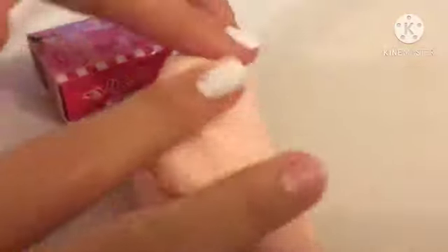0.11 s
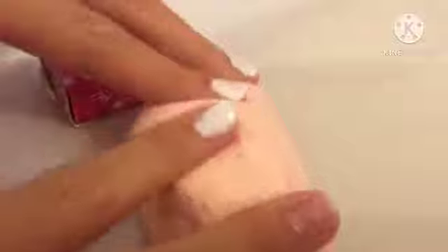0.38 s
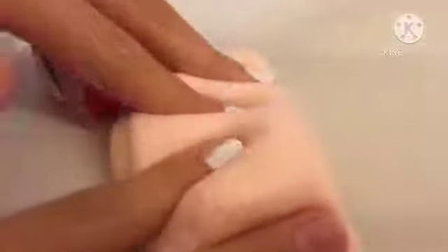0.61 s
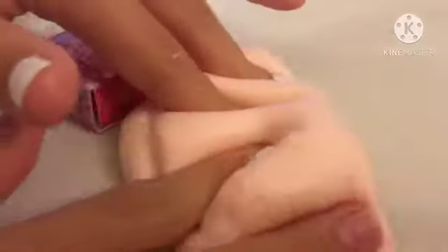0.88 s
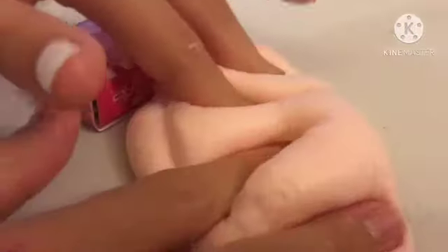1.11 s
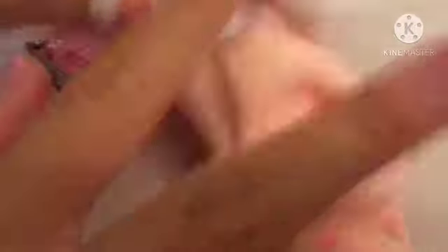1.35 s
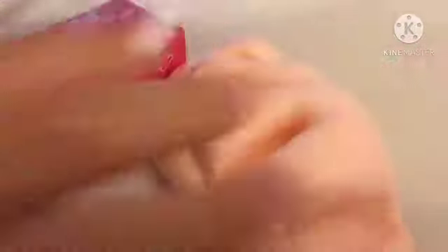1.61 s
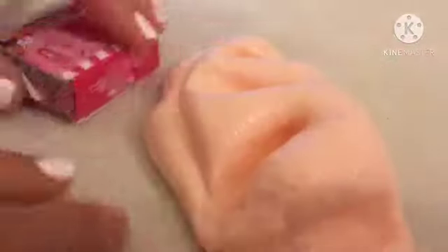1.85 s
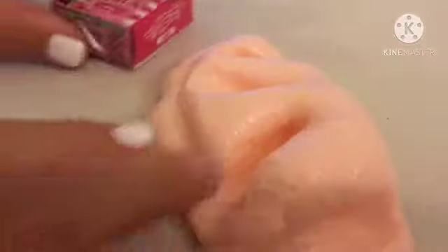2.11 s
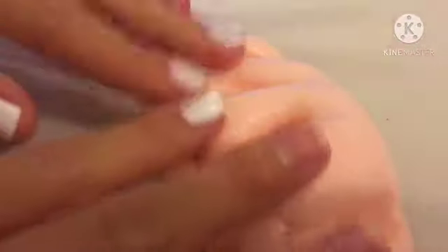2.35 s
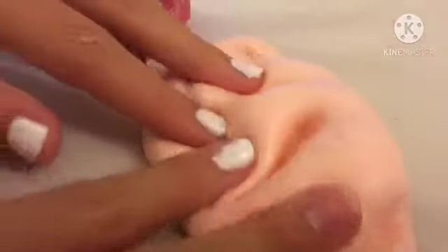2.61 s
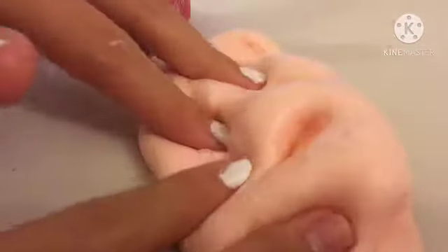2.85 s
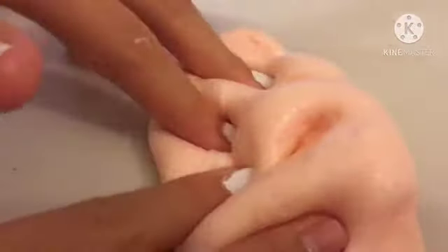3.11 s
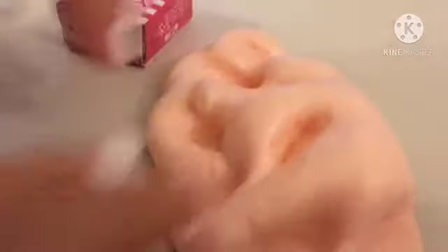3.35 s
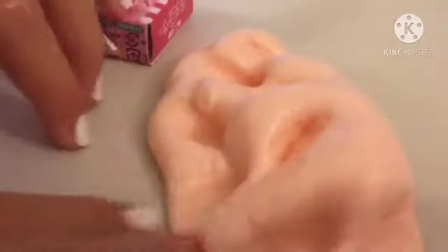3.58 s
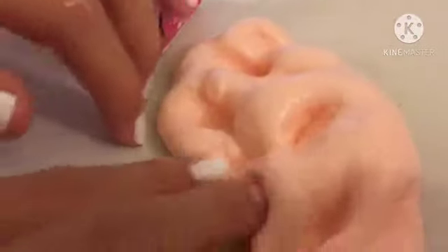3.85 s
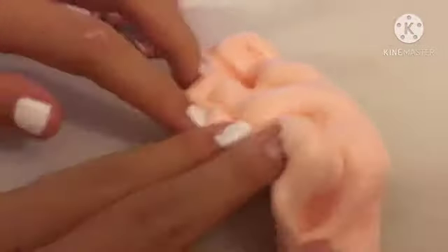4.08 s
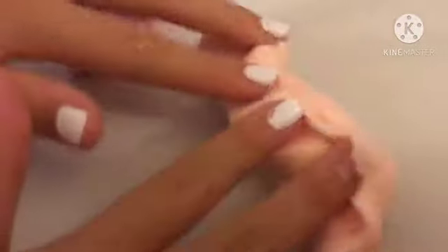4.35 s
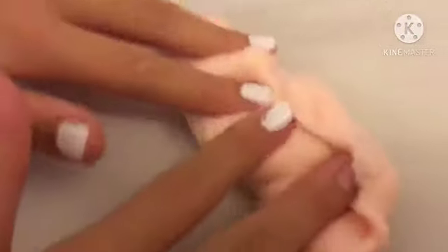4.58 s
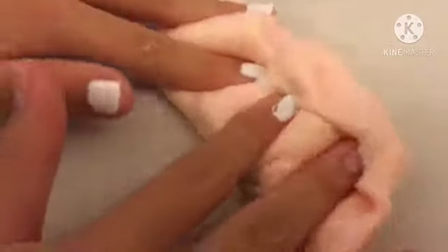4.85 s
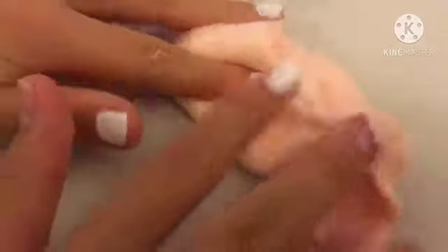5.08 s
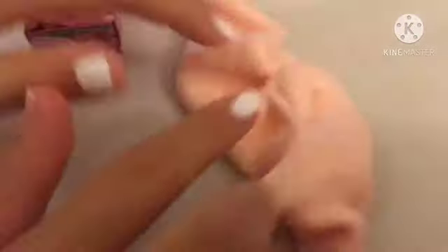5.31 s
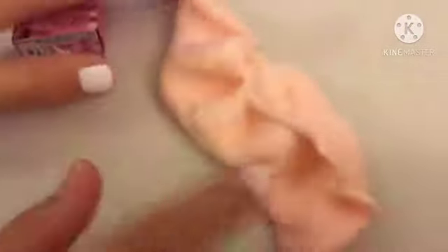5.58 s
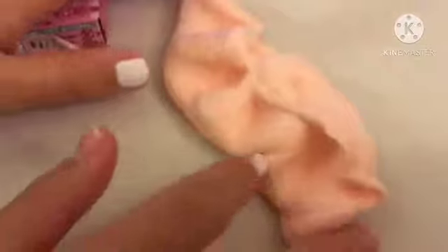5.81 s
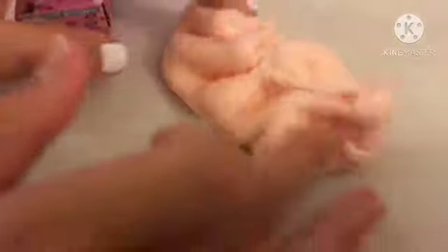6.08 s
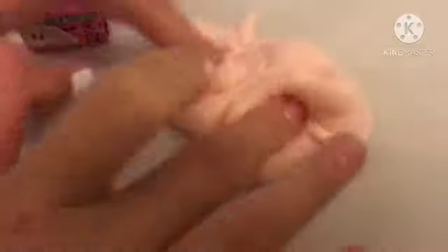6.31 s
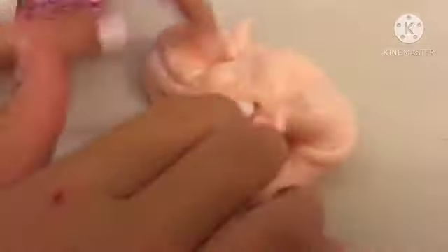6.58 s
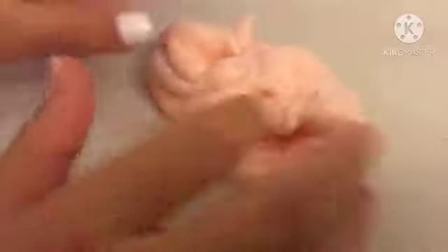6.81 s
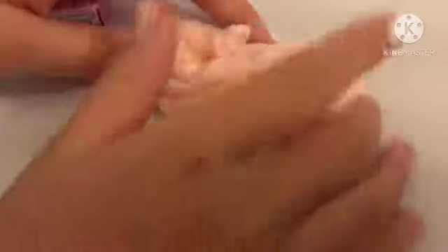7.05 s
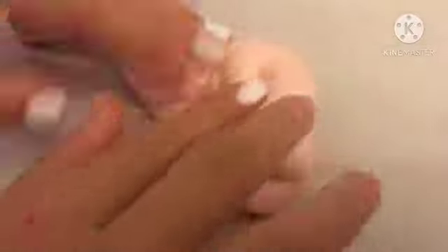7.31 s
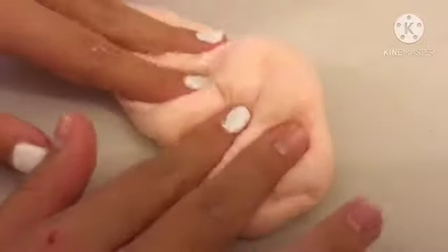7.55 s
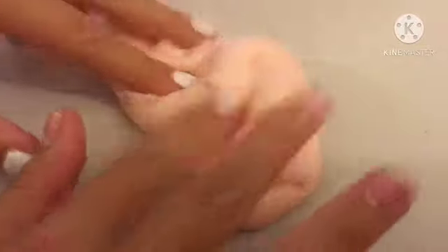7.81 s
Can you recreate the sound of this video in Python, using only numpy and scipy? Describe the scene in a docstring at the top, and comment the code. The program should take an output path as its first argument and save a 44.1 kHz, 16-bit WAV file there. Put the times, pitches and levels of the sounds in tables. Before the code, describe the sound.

A quiet indoor room with soft low noise and a faint hum. Slime is kneaded on a table right beside a small microphone. Mostly tiny ticks and airy foam rustle for three seconds, then a bright pop and a crowded run of boomy table thumps, ragged sticky snaps and dense crackle. Afterward come isolated thumps, a wet squelchy push, and faint rubs with a few light clicks.

```python
"""Kneading foamy slime on a table

Hands knead soft foamy slime on a table, close to a phone microphone that feels the table top shake.
Presses send thuds through the board, treble first; sticky slime snaps off it and off the fingers
as a crack, a ragged tear and a ring of the table. Grains of noise make the pushes and wet squelches;
hiss and crackle swell in rubbing strokes and a few short dense tears, over room noise and a faint hum."""
import sys
import numpy as np
from scipy import signal
from scipy.fft import rfft, irfft, next_fast_len
from scipy.io import wavfile
from scipy.ndimage import uniform_filter1d

SR = 44100
rng = np.random.default_rng(int(sys.argv[2]) if len(sys.argv) > 2 else 0)


def output_pcm(signal):
    """Save a mono or channel-first signal as 16-bit PCM at the path in sys.argv[1].

    Samples are clipped to [-1, 1] before scaling.
    """
    pcm = np.clip(np.atleast_2d(signal).T, -1, 1) * 32767
    wavfile.write(sys.argv[1], SR, np.round(pcm).astype(np.int16))


def level_to_linear(level):
    """Convert decibel levels to linear amplitude factors, elementwise."""
    exponent = np.asarray(level, float) / 20
    return 10 ** exponent


N = 349713  # length [samples]

# presses felt through the table top:
# (time [s], peak level [dB], centre [Hz], width [natural log of frequency])
THUDS = [(0.177, -39.5, 170, 0.39), (0.7764, -43, 96, 0.14), (0.798, -45.5, 93, 0.11),
         (1.3318, -31, 116, 0.56), (1.3609, -26, 154, 0.16), (1.865, -45.5, 96, 0.062),
         (3.281, -30, 164, 0.2), (3.3217, -20.5, 420, 0.28), (3.47, -32, 137, 0.2), (3.5618, -30.5, 166, 1),
         (3.5862, -25.5, 117, 0.49), (3.902, -13, 221, 0.37), (3.95, -13.5, 105, 0.56),
         (3.9962, -14.5, 123, 0.41), (4.0343, -21, 88, 0.36), (4.0638, -20.3, 72.6, 0.71),
         (4.082, -33, 60.0, 0.51), (4.1654, -19, 164, 0.5), (4.189, -10, 82, 0.51),
         (4.2096, -19.5, 112, 0.65), (4.2687, -22.5, 91, 0.7), (4.3234, -10, 113, 0.43),
         (4.3853, -24.5, 85.6, 0.54), (4.422, -16.5, 116, 0.37), (4.4915, -26, 60.0, 1),
         (4.5803, -25, 136, 0.37), (4.63, -21, 137, 0.32), (4.7289, -14.5, 120, 0.39),
         (4.7635, -19.5, 128, 0.56), (4.8142, -10.5, 116, 0.55), (4.881, -23, 91.6, 0.23),
         (5.1658, -21, 98, 0.4), (5.19, -26, 135.0, 0.57), (5.293, -17.5, 132, 0.41),
         (5.5046, -32, 109, 0.36), (5.6478, -30.6, 141, 0.57), (5.7318, -31.5, 133, 0.51),
         (5.897, -29.5, 137, 0.6), (6.007, -28.5, 168, 0.42), (6.0353, -34, 90.0, 0.97),
         (6.0627, -27.5, 114, 0.42), (7.899, -54, 110.0, 0.26)]
# bending-wave delay at 100 Hz [s], power of its growth towards the bass, phase of the push [rad]
SPREAD_S, SPREAD_POWER, THUD_TURN_RAD = 0.01207, 1.758, 2.7

# sticky snaps: (time [s], level [dB], pop [Hz], table ring relative to the snap [dB], pop share [0-1])
SNAPS = [(0.4938, -51, 1260, 0, 0.2), (1.328, -41, 1590, 2.5, 0.16), (1.3515, -32, 2010, 2.5, 0),
         (1.4851, -48, 1280, -6, 0.05), (1.495, -44, 1190, 8.5, 0.6), (1.9085, -43, 1930, -16, 0.8),
         (1.951, -50, 1420, -16, 1), (1.9895, -51, 1340, -17, 0.7), (2.0869, -47.5, 1240, -14, 0.2),
         (2.1313, -48, 1880, -5.5, 0.37), (2.7384, -46.5, 1160, -4, 0.1), (3.27, -20.5, 2000, -5, 0.49),
         (3.3102, -38.5, 2350, 10, 0.4), (3.4693, -48.5, 1150, 15.5, 0.17), (3.5478, -41.5, 1210, 5, 1),
         (3.5572, -33, 1510, 10.5, 0.42), (3.8447, -38.5, 960, 5, 0.33), (3.9024, -44, 1320, 19.5, 0.9),
         (3.932, -39, 1380, -2, 1), (3.947, -21, 1140, -4.5, 0.61), (3.9572, -39.5, 1370, 6, 1),
         (3.9733, -40, 1330, 9, 0.6), (4.065, -32.5, 930, -2.5, 0.99), (4.0927, -39.5, 1780, -15, 0.5),
         (4.16, -41.5, 2060, 3.5, 1), (4.1802, -35.5, 1040, 11.5, 0.6), (4.1938, -31.5, 1220, 5.5, 1),
         (4.2615, -37.5, 1090, 6.5, 1), (4.3109, -36.5, 1130, 1, 1), (4.324, -41, 1010, -1, 0),
         (4.3944, -46, 1020, 9, 0.5), (4.397, -47.5, 7000, -13, 1), (4.4027, -32.5, 1110, -2, 1),
         (4.4215, -36, 1010, 7, 0.54), (4.446, -39, 7100, -5, 0.9), (4.469, -29, 1240, 4, 0.4),
         (4.4798, -24.5, 1030, -9, 0.6), (4.525, -39, 1040, -28, 0.6), (4.5327, -33, 1100, 0.5, 0.58),
         (4.58, -43.5, 1550, 13, 0.3), (4.626, -32, 1220, 0.5, 0.45), (4.637, -36, 2350, -4, 0),
         (4.7059, -34, 2210, -17, 0.8), (4.7185, -22, 960, -2, 0.3), (4.7273, -26.5, 2140, -4, 0.32),
         (4.7572, -26, 2450, -8, 0.3), (4.8038, -28.5, 1360, -3.5, 0.3), (4.8158, -26, 930, -9.5, 0.33),
         (4.8753, -45.5, 1000, 10, 0.2), (4.9217, -46, 1030, -3, 0.24), (5.1664, -36, 1540, 6.5, 0.3),
         (5.2885, -32.5, 1460, -1.5, 0.34), (6.6582, -43, 3030, -8, 0.3), (7.2321, -52.5, 1610, -6, 0.1),
         (7.3002, -52, 3460, -19, 0.8), (7.3283, -40, 1600, -30, 1), (7.449, -34.5, 3150, -13, 0.33),
         (7.504, -61, 1110, -14, 0.1), (7.8785, -43.5, 1560, -7.5, 0)]
# spectrum of a bright snap: (frequency [Hz], relative level [dB per Hz])
SNAP_COLOUR = [(410, -58), (700, 3), (1810, -7.5), (2150, 0.5), (2860, -6.5), (4830, -6), (7240, -19),
               (8920, -14.5), (12000, -35), (15800, -32)]
# ringing modes of the table: (nominal frequency [Hz], lowest level [dB], 60 dB decay time [s])
TABLE_MODES = [(93.7, -3.5, 0.21), (149.4, -0.5, 0.082), (221.6, -4, .17), (274.2, -8.5, 0.26),
               (361.2, -3.5, 0.075), (467, -7, 0.076), (551, -7, 0.066), (626.6, -12.5, 0.1),
               (747, -19, 0.11), (887, -16.5, 0.021), (1152, -20.5, 0.024)]
# the wet tear lasts longer where the slime grips the board harder
TEAR_S, TEAR_DB_PER_RING_DB = 0.074, 0.49  # 60 dB fall at 0 dB ring [s], its growth with the ring

# kneading over time: (time [s], shaking of the board [dB], wet squelch [dB])
KNEAD = [(0, -56.5, -68.5), (1.27, -59.5, -66), (1.38, -50, -51.5), (1.6, -66, -67), (2, -57.5, -67.5),
         (3.2, -62, -68.5), (3.342, -61, -40.5), (3.456, -57, -70), (3.64, -49.5, -68), (3.87, -43, -47.5),
         (4.048, -28, -42.5), (4.12, -57, -51), (4.21, -26, -55), (4.262, -24.5, -65), (4.396, -57, -49),
         (4.534, -36, -52), (4.65, -61, -42), (4.718, -26.5, -51.5), (4.83, -29, -44), (4.894, -45.5, -57),
         (5.192, -38.5, -43.5), (5.316, -39, -58), (5.42, -59, -63), (5.94, -50.5, -66.5),
         (6.054, -33.5, -40), (6.2, -65.5, -68), (6.58, -65, -63.5), (6.67, -53, -51), (6.78, -61.5, -65),
         (7.73, -62, -66.5), (7.93, -53.5, -80)]
# spectrum of the shaking: (frequency [Hz], relative level [dB per Hz])
SHAKE_COLOUR = [(15, -38), (25, -34), (52, -4.5), (92, 2), (143, 0), (271, -15.5), (389, -17.5), (500, -26),
                (650, -29), (1100, -120)]
# spectrum of the squelch: (frequency [Hz], relative level [dB per Hz])
SQUELCH_COLOUR = [(120, -54), (200, -3.5), (273, 1), (386, -5.5), (635, -11), (897, -22.5), (1500, -25),
                  (1950, -84), (3300, -120)]

# rubbing strokes of skin on foam, and a few short bursts of dense tearing:
# (start [s], length [s], level [dB], hollow resonance [Hz], brightness [dB], air [dB])
STROKES = [(0, .07, -83, 2400, 13, -3), (.11, 0.14, -81, 1800, 5, 9), (0.651, 0.2, -74.5, 1760, 2, 1),
           (0.896, 0.26, -73, 1960, 7, -3), (1.304, 0.15, -62, 2400, -1, 4), (1.564, 0.38, -74, 2450, 9, 8),
           (1.82, 0.5, -68, 1320, 0, -9), (3.247, 0.11, -62.5, 1390, 4, 4),
           (3.815, 0.21, -58, 1290, -29, 6.5), (3.984, .06, -72, 1210, -10, 8),
           (4.018, 0.044, -62, 1220, -7, 5), (4.048, 0.055, -56, 1220, -4, 6),
           (4.169, .045, -52, 1240, -10, 3.5), (4.213, 0.2, -86, 1200, -18, 1),
           (4.36, 0.17, -64.5, 1200, -8, 3), (4.462, 0.052, -55.5, 1200, -14, 13.5),
           (4.515, 0.057, -56.5, 1200, -10, 12), (4.563, 0.093, -57, 1220, 3, 8),
           (4.617, 0.07, -51.5, 2200, 3, 3), (4.679, 0.078, -56.5, 2200, -4, 0),
           (4.717, 0.021, -40.5, 2150, 4, -1), (4.746, 0.028, -46, 2390, -3, -3),
           (4.8, .02, -43, 2200, 1.5, -9), (4.823, .1, -68, 1900, -1, 3), (4.924, 0.14, -71, 1700, 5, 3),
           (5.019, .2, -60.5, 1700, 4.5, 2), (5.156, 0.18, -59.5, 2200, 10.5, -1),
           (5.3, 0.42, -74, 1650, 5, -9), (5.87, 0.19, -74, 2310, 9, -8), (5.978, 0.15, -59.5, 2700, 2, -2),
           (6.614, 0.09, -64.5, 1500, -2, -2), (6.94, 0.19, -69, 2900, 2.5, 1),
           (7.225, 0.04, -73, 3800, 6, 8), (7.318, 0.1, -74, 1400, -24, -12),
           (7.438, 0.097, -65.5, 2490, -5, -16), (7.861, 0.089, -63.5, 1510, 7.5, 0)]
# faint rustle under and between the strokes: (time [s], level [dB], air [dB])
RESTING = [(0, -75, 3.5), (3.2, -76.5, 3.5), (3.4, -69, 2), (3.8, -72, 1), (4.3, -67.5, 5),
           (5.7, -68.5, -0.5), (6.5, -71, -4), (7.93, -71.5, -1.5)]
# spectrum of the rustle: (frequency [Hz], relative level [dB per Hz])
RUSTLE_COLOUR = [(470, -48), (800, 1), (918, -7.5), (977, -4), (1110, -4.5), (1590, -6.5), (1820, -7.5),
                 (2200, -7), (3040, -9), (6360, -16.5), (7390, -20.5), (8270, -20.5), (15800, -31.5)]
STROKE_POWER, STROKE_SKEW = 1.43, 0.76  # roundness of a stroke's swell; below 1 it peaks early

# phone shell and table bounce: (centre [Hz], width [Hz], level of the added band [dB])
BODY = [(1550, 36, -1), (2244, 15, -6), (3460, 23, -8.5), (4700, 27, -3), (5450, 34, 1.5), (8430, 61, -8),
        (9000, 840, -7)]

# spectrum of the room noise: (frequency [Hz], relative level [dB per Hz])
ROOM_COLOUR = [(15, -50), (25, -15.5), (89, 0.5), (133, 0), (352, -10.5), (437, -18), (710, -13),
               (956, -36.5), (3590, -36.5), (7640, -38), (8510, -40.5), (14600, -44.5), (15800, -51)]
ROOM_DB = -60.5  # rms level [dB]
# faint hum and a fuzzy band of noise above it: (time [s], hum rms [dB], band rms [dB])
DRONE = [(0, -65.5, -100), (3, -68, -114), (5.3, -82, -74), (6.2, -61, -101), (7.93, -59.5, -75.5)]
HUM_HZ, BAND_HZ = 122, 1560


def evened(x):
    """Scales to rms 1."""
    return x / np.sqrt(np.mean(x ** 2) + 1e-20)


def read(points, hz):
    """Reads a spectrum on a log-frequency axis."""
    f, value = np.transpose(points)
    return np.interp(np.log(hz + 1), np.log(f + 1), value)


def add(mix, s, sound):
    """Mixes a sound in at second s."""
    part = mix[round(s * SR):][:len(sound)]
    part += sound[:len(part)]


def gain_curve(points, index):
    """One dB column of a table over time, as a gain for every sample."""
    rows = np.array(points)
    return level_to_linear(np.interp(np.arange(N) / SR, rows[:, 0], rows[:, index]))


def coloured(x, points):
    """Filters by a spectrum and evens the level."""
    size = next_fast_len(len(x))
    gain = level_to_linear(read(points, np.fft.rfftfreq(size, 1 / SR)))
    return evened(irfft(rfft(x, size) * gain, size)[:len(x)])


def resonate(x, hz, width_hz):
    """A resonance that follows the curve hz: shifted down to 0 Hz, smoothed, shifted back."""
    turn = np.exp(2j * np.pi * np.cumsum(hz * np.ones(len(x))) / SR)
    r = np.exp(-np.pi * width_hz / SR)
    return 2 * (turn * signal.lfilter([1 - r], [1, -r], x / turn)).real


def resonate_twice(x, hz, width_hz, second_width_hz):
    """Two resonances in a row, for steeper sides, evened to rms 1."""
    return evened(resonate(resonate(x, hz, width_hz), hz, second_width_hz))


def grains(per_s, spread_db, share):
    """Sparse clicks of uneven size blended with white noise."""
    size = level_to_linear(spread_db * np.minimum(rng.exponential(1, N), 4))
    clicks = size * (rng.random(N) < per_s / SR) * rng.choice([-1., 1.], N)
    return share * evened(clicks) + (1 - share) * rng.standard_normal(N)


def bend(hz):
    """Phase of bending waves in a board: the bass travels slower and arrives late."""
    power = 1 - SPREAD_POWER
    cycles = SPREAD_S * 100 * ((hz + 1) / 100) ** power / power
    return np.exp(-2j * np.pi * cycles)


def thuds():
    """Each press is a soft push, smeared by the board into a falling whoop."""
    out = np.zeros(N)
    hz = np.fft.rfftfreq(16384, 1 / SR)
    lead = 1024  # room for the push to rise [samples]
    for s, db, centre_hz, width in THUDS:
        bell = -.5 * (np.log((hz + 1) / centre_hz) / width) ** 2
        push = np.exp(bell + 1j * THUD_TURN_RAD)
        whoop = np.roll(irfft(push * bend(hz)), lead)
        add(out, s - lead / SR, level_to_linear(db) * whoop / abs(whoop).max())
    return out


def table_ring(after):
    """Decaying table modes, each with its own chance pitch and level; soft slime pushes slowly."""
    ring = np.zeros(len(after))
    for hz, mode_db, t60 in TABLE_MODES:
        pitch_luck, level_luck = rng.random(2)
        decay = level_to_linear(mode_db + 4.9 * level_luck - 60 * after / t60)
        tone = np.sin(2 * np.pi * hz * (.9 + 0.195 * pitch_luck) * after)
        ring += decay * tone * (1 - np.exp(-after * hz / 0.7))
    return ring


def snaps():
    """A crack, a ragged tear whose hollow sinks as the pocket opens, and the ring of the table."""
    out = np.zeros(N)
    t = np.arange(SR // 4) / SR
    lead = .012  # time kept ahead of the break [s]
    after = np.maximum(t - lead, 0)
    for s, db, pop_hz, ring_db, share in SNAPS:
        length = TEAR_S * level_to_linear(TEAR_DB_PER_RING_DB * ring_db)
        # strands start to give just before the break
        peel = level_to_linear(-60 * np.maximum(lead - t, 0) / (0.1 * length))
        crack = peel * level_to_linear(-60 * after / 0.0093)
        tear = peel * level_to_linear(-11 - 60 * after / length)
        # strands break in clumps
        ragged = level_to_linear(2.94 * resonate_twice(rng.standard_normal(len(t)), 0, 900, 900))

        noise = rng.standard_normal(len(t))
        sinking_hz = pop_hz * (0.33 + 0.65 * np.exp(-after / (0.2 * length)))
        hollow = resonate_twice(noise, sinking_hz, 0.44 * pop_hz, 0.48 * pop_hz)
        bright = coloured(noise, SNAP_COLOUR)
        dull = signal.lfilter([.4], [1, -.72], bright)  # the wet tear is duller than the crack

        rip = crack * bright + tear * ragged * dull
        # smoothed over one cycle of the pop
        pop = uniform_filter1d(crack + tear * ragged, size=round(SR / pop_hz)) * hollow
        burst = (1 - share) ** 2 * rip + share * pop
        burst *= np.linalg.norm(crack + tear) / np.linalg.norm(burst) / 2

        # slow random wavering of the ring's level
        ring_waver = level_to_linear(1.33 * resonate_twice(noise, 0, 200, 200))
        ring = table_ring(after) * ring_waver
        add(out, s - lead, level_to_linear(db) * (burst + level_to_linear(ring_db) * ring))
    return out


def kneading():
    """Small pushes shake the board and wet pockets squelch into it, both smeared by bending waves."""
    size = next_fast_len(N)
    spread = bend(np.fft.rfftfreq(size, 1 / SR))
    pushes = irfft(rfft(grains(70, 1.75, 0.73), size) * spread, size)[:N]
    pockets = irfft(rfft(grains(200, 0.67, 0.55), size) * spread, size)[:N]
    shaking = gain_curve(KNEAD, index=1) * coloured(pushes, SHAKE_COLOUR)
    squelch = gain_curve(KNEAD, index=2) * coloured(pockets, SQUELCH_COLOUR)
    return shaking + squelch


def lowpass(x, hz):
    """Keeps the sound below hz without delaying it."""
    return signal.sosfiltfilt(signal.butter(3, hz, fs=SR, output="sos"), x)


def rubbing_and_tearing():
    """Hiss and foam crackle swell in each rubbing stroke or short dense tear, with a hollow resonance."""
    hiss = grains(1200, 2.2, 0.12)
    foam = level_to_linear(-7) * crackle(90, 3.24, 2.46)
    rustle = coloured(hiss + foam, RUSTLE_COLOUR)
    low, mid = lowpass(rustle, 3800), lowpass(rustle, 7800)
    bright, air = mid - low, rustle - mid
    out = gain_curve(RESTING, index=1) * (mid + gain_curve(RESTING, index=2) * air)
    for s, length, db, hollow_hz, bright_db, air_db in STROKES:
        span = slice(round(s * SR), round((s + length) * SR))
        u = np.arange(len(low[span])) / (length * SR)  # progress through the stroke, 0-1
        swell = abs(np.sin(np.pi * u ** STROKE_SKEW)) ** STROKE_POWER
        hollow = level_to_linear(2.5) * resonate(rustle[span], hollow_hz, 300)
        treble = level_to_linear(bright_db) * bright[span] + level_to_linear(air_db) * air[span]
        add(out, s, level_to_linear(db) * swell * (low[span] + hollow + treble))
    return out


def crackle(per_s, spread_db, cycles):
    """Foam cells burst, each size with its own short ring."""
    out = np.zeros(N)
    t = np.arange(512) / SR
    for hz in np.geomspace(900, 11000, num=14):
        ring = np.exp(-t * hz / cycles) * np.sin(2 * np.pi * hz * t)
        ring *= np.sqrt(hz / 1000) / np.linalg.norm(ring)  # higher rings weigh more
        out += signal.oaconvolve(grains(per_s, spread_db, 0.81), ring)[:N]
    return evened(out)


def shell(x):
    """Airborne sound gains fixed resonant bands on its way into the microphone."""
    return x + sum(level_to_linear(db) * resonate(x, hz, width_hz) for hz, width_hz, db in BODY)


def room():
    """Steady room noise, a slightly wavering hum and a fuzzy band of noise."""
    noise = level_to_linear(ROOM_DB) * coloured(rng.standard_normal(N), ROOM_COLOUR)
    waver_hz = 1.4 * evened(uniform_filter1d(rng.standard_normal(N), size=8000))
    hum = np.sqrt(2) * np.sin(2 * np.pi * np.cumsum(HUM_HZ + waver_hz) / SR)
    band = evened(resonate(rng.standard_normal(N), BAND_HZ, 80))
    return noise + gain_curve(DRONE, index=1) * hum + gain_curve(DRONE, index=2) * band


def scene():
    """All sources at one microphone; snaps, rubbing and tearing pass through the shell."""
    through_board = thuds() + kneading()
    airborne = shell(snaps() + rubbing_and_tearing())
    return (through_board + airborne + room())[None]


def band_limit(x):
    """A steep low-pass at the top of the band."""
    return signal.sosfilt(signal.butter(12, 15980, fs=SR, output="sos"), x)


def record(dry):
    """Steep bass cut of the microphone below 42 Hz."""
    bass_cut = signal.butter(4, 42, "high", fs=SR, output="sos")
    return band_limit(signal.sosfilt(bass_cut, dry))


dry = scene()
out = record(dry)
output_pcm(out)
```